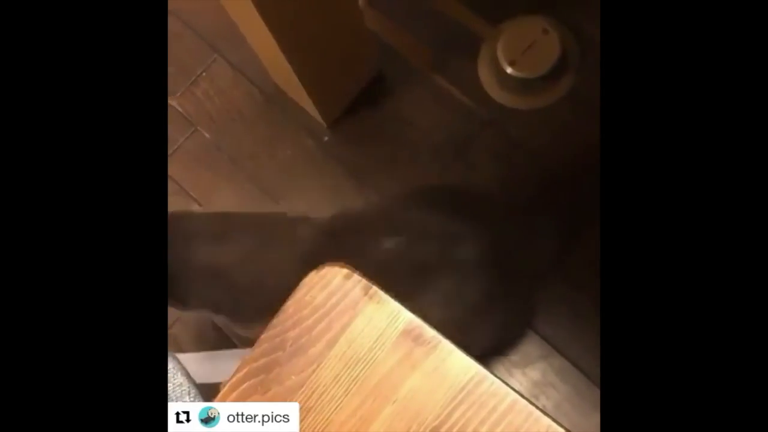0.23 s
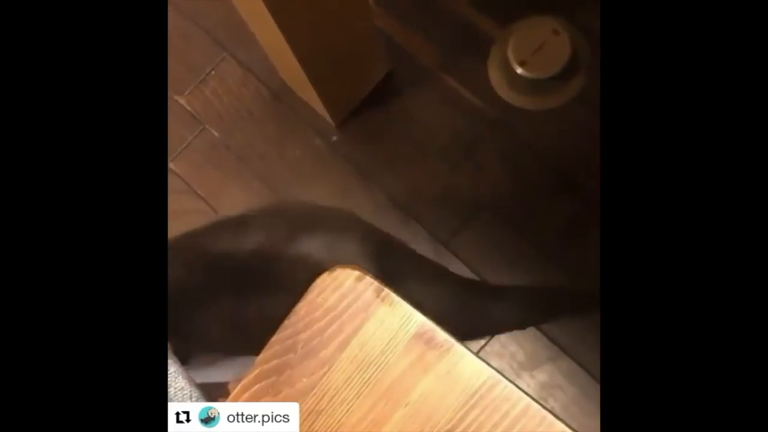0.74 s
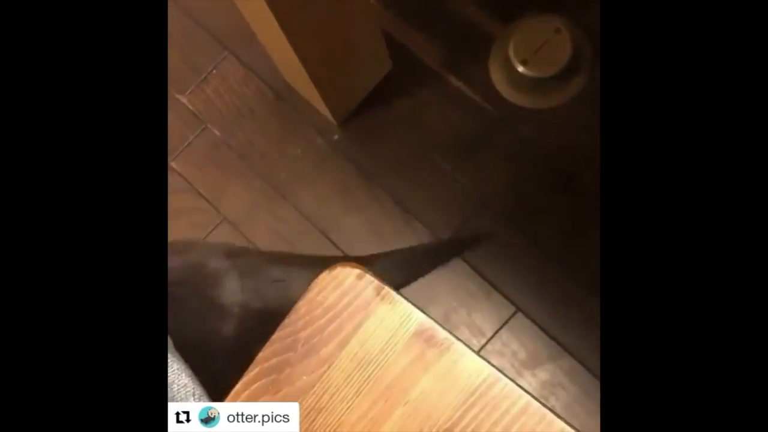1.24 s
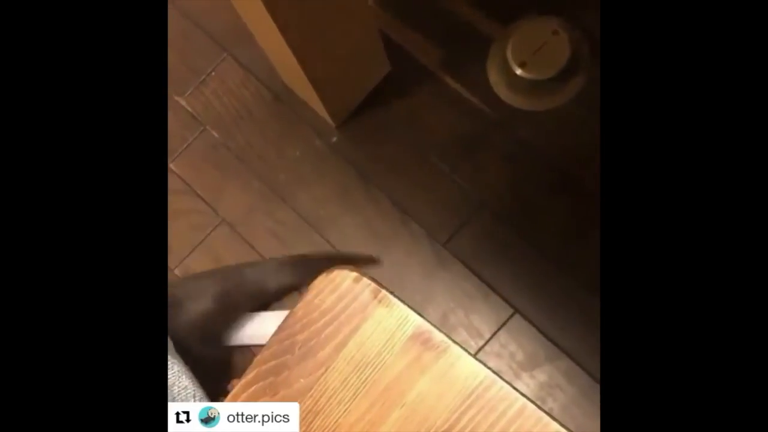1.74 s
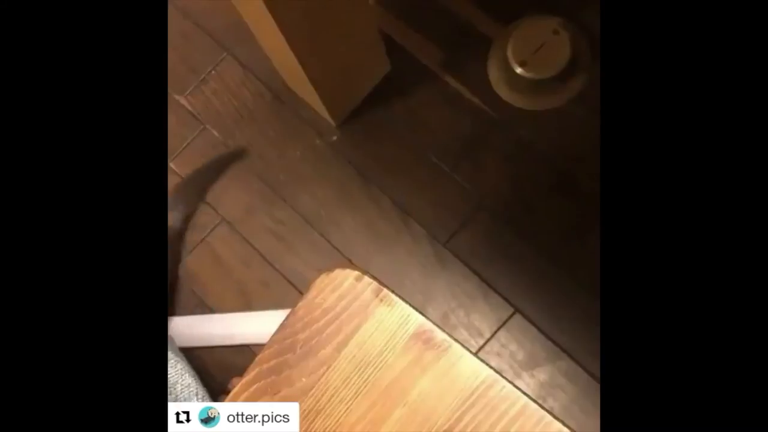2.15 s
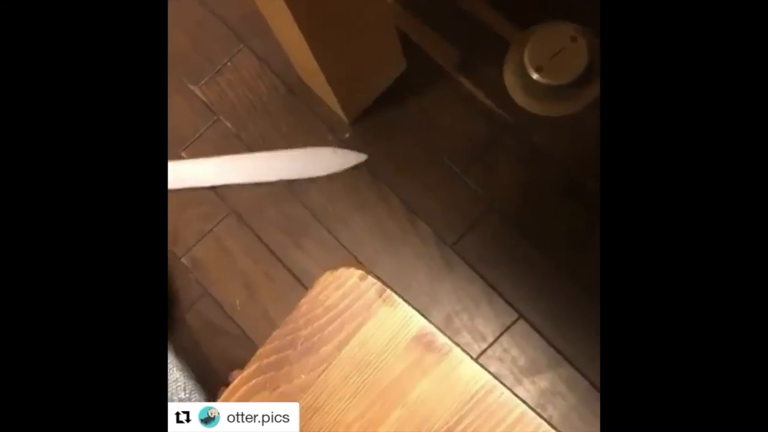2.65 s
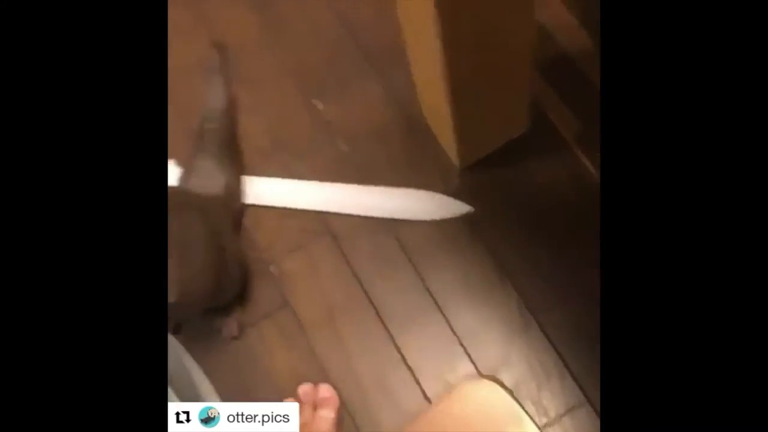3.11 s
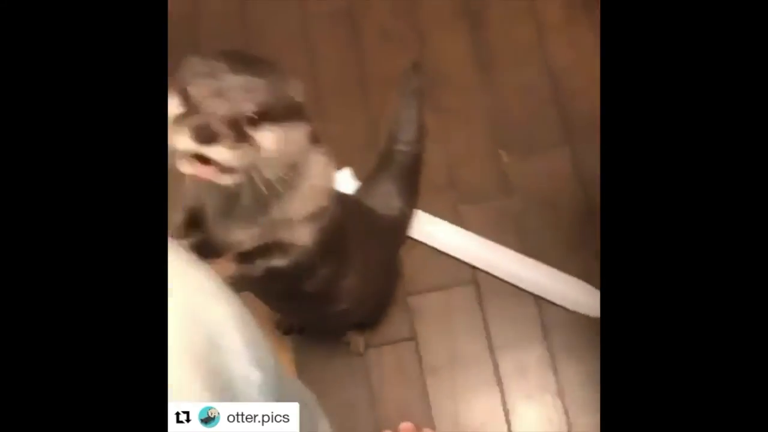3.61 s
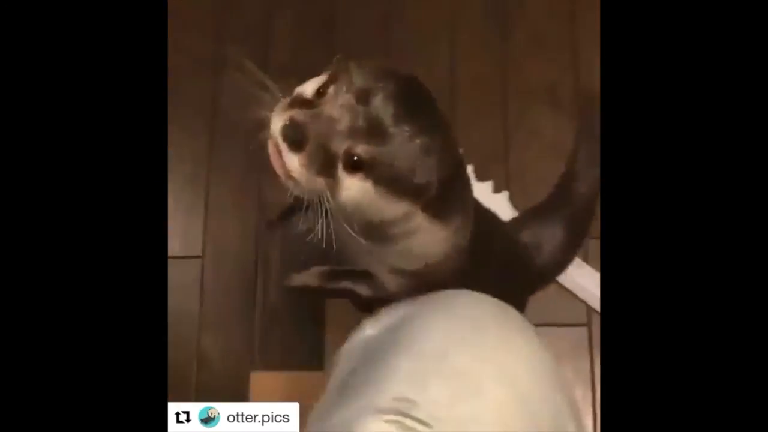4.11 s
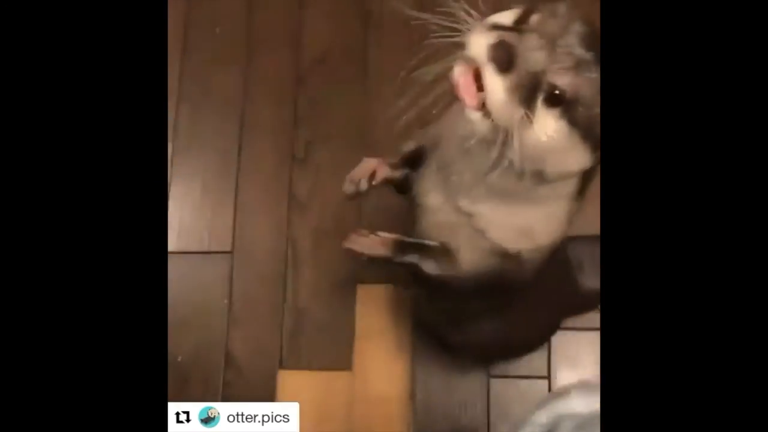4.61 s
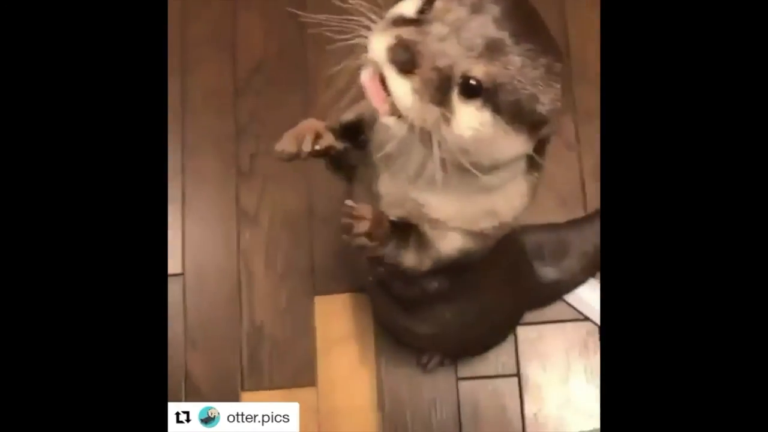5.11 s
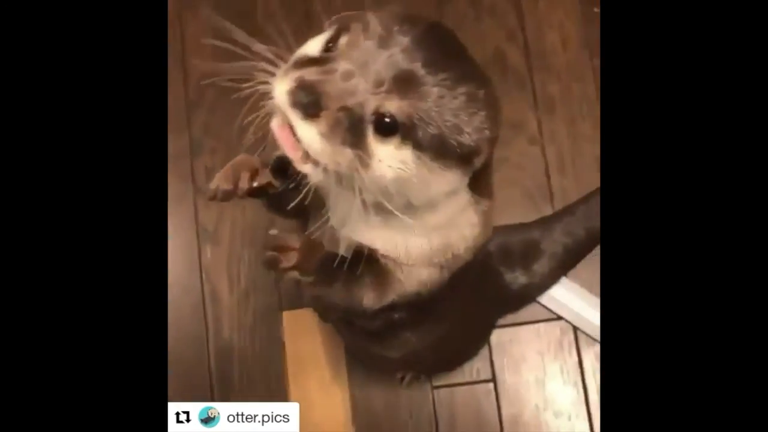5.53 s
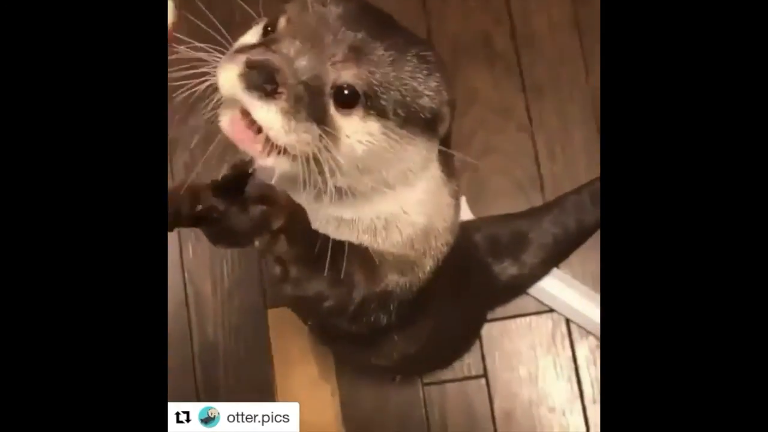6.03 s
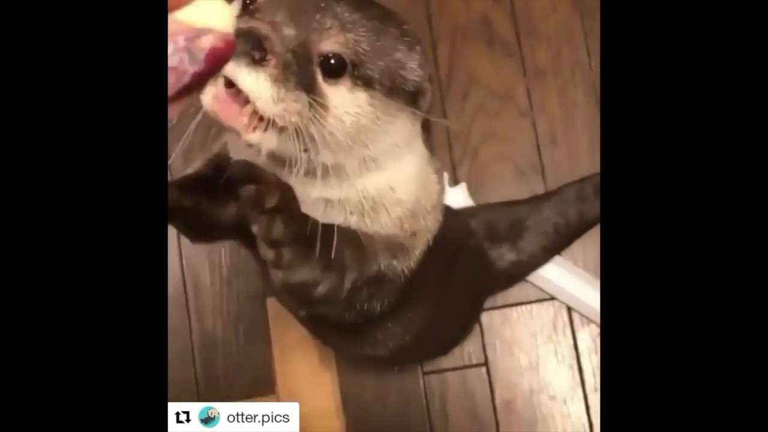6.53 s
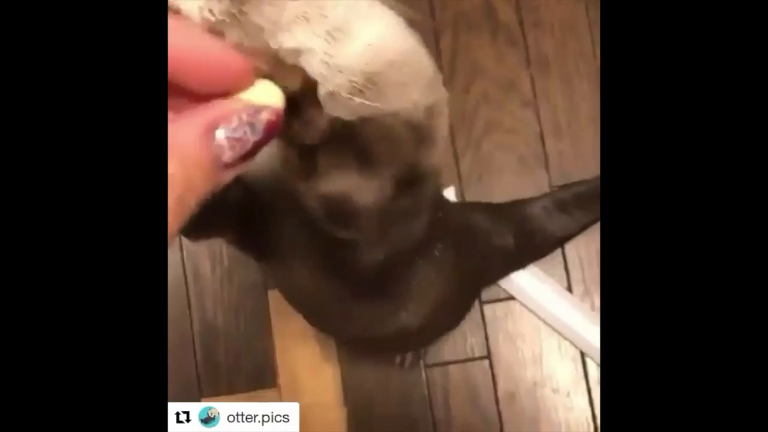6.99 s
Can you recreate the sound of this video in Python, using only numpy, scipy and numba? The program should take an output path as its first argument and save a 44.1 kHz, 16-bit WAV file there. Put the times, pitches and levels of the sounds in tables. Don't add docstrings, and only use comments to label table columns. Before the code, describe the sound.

Close, piercing otter begging cries with a hoarse edge, broken by a pause of soft scuffing and claw knocks on a wood floor.

```python
import sys
import numpy as np
from scipy import signal
from scipy.fft import rfft, irfft
from scipy.io import wavfile
from scipy.ndimage import uniform_filter1d, map_coordinates
from numba import njit

SR = 44100
rng = np.random.default_rng(int(sys.argv[2]) if len(sys.argv) > 2 else 0)


def to_wav(sig):
    pcm = np.clip(np.atleast_2d(sig), -1, 1) * 32767
    pcm = np.round(pcm).astype(np.int16)
    wavfile.write(sys.argv[1], SR, pcm.T)


def gain_from_db(level_db):
    decades = np.asarray(level_db, float) / 20
    return 10 ** decades


N = 320166

# start_s, pitch_hz, effort_db, strain (0-1), mouth_resonance_hz
SQUEAL = [(0.0, 468, -33, 0.94, 3320), (.018, 466, -26.5, 0.63, 3520), (.036, 385, -35, 0.98, 3280),
          (.05, 396.4, -39.5, 1.13, 2430), (.072, 389.5, -35.5, 1.22, 2400), (.1, 388.7, -34, 1, 2270),
          (.13, 437, -36, 0.82, 2190), (.154, 607, -56, 1, 2260)]
WHIMPER = [(.154, 601.5, -43.5, 0.85, 2200), (0.215, 622.6, -46, 0.63, 2470), (0.306, 626, -49, 0.67, 2620),
           (0.328, 651, -36, 0.2, 2505), (.421, 623, -47, 0.6, 2600), (0.504, 640.5, -51, 0.55, 2470),
           (.536, 478, -65, 1, 2574), (0.571, 353, -69, 0.98, 2640), (.64, 338, -57, 0.97, 2596)]
FALLING = [(2.21, 772, -73, 0.17, 2417), (2.248, 817, -36.5, 0.45, 2416), (2.281, 778, -46, 0.97, 2826),
           (2.338, 734, -45, 1, 2920), (2.391, 679, -37, 0.87, 3035), (2.506, 654.7, -33.5, 0.85, 3050),
           (2.62, 618, -28, 0.76, 3034), (2.692, 572.4, -32, 0.98, 3158), (2.787, 488.4, -29.5, 0.82, 3180)]
HICCUP = [(2.788, 490, -31, 0.76, 3040), (2.863, 657, -36.5, 0.66, 3174), (2.905, 678, -31.5, 0.49, 3100),
          (2.979, 559, -42.5, .1, 3160), (3.12, 515, -57, 0.34, 2652)]
WHINE = [(3.119, 520, -49, 0.55, 2680), (3.2, 553, -34, 0.14, 2760), (3.292, 589, -30.5, 0.51, 2890),
         (3.33, 565.5, -29.5, 0.45, 2880), (3.461, 587.4, -29, 0.44, 2727),
         (3.556, 609.6, -29.5, 0.45, 2750), (3.662, 587, -33.5, 0.42, 2870), (3.721, 593, -18, 0.83, 2767)]
SCREAM = [(3.848, 478, -31.5, 0.57, 2900), (3.875, 487, -25, 0.79, 3021), (3.914, 477, -27, 1.06, 3180),
          (3.94, 448.8, -24, 1, 3130), (4.084, 444, -25.5, 1.07, 3090), (4.104, 474.3, -24, 0.99, 3120),
          (4.182, 459.5, -24, 1.04, 3211), (4.227, 472.7, -24.5, 1.03, 3144),
          (4.239, 642.3, -28, 0.58, 3070)]
EASING = [(4.239, 627, -24, 0.67, 3130), (4.252, 635, -29.5, 0.75, 3176), (4.267, 542, -22, 0.73, 3100),
          (4.285, 618.4, -28, 0.53, 3170), (4.349, 640.6, -27, 0.64, 3060),
          (4.529, 589.2, -33.5, 0.42, 3070), (4.664, 595, -31, 0.54, 3040), (4.701, 567.4, -30, 0.48, 2942),
          (4.93, 546.8, -34.5, 0.35, 2860)]
PLEA = [(5.11, 557, -40.5, 0.75, 2960), (5.142, 560.6, -35, 0.59, 2400), (5.263, 581.8, -29.5, 0.65, 3006),
        (5.295, 558, -24.5, 0.65, 3046), (5.458, 576, -27.5, 0.35, 3023), (5.767, 604, -26.5, 0.16, 2890),
        (5.896, 579, -32.5, 0.47, 2677), (5.969, 556, -43, 0.26, 2870)]
DEMAND = [(6.242, 583, -35, 0.62, 2690), (6.282, 596.6, -24.5, 0.73, 3215), (6.411, 642, -22.5, 0.4, 2745),
          (6.525, 612, -25.5, 0.42, 2927), (6.77, 618.5, -25.5, 0.038, 3110), (6.822, 604, -34, 0.39, 2949),
          (6.981, 641.3, -27, 0.28, 2983), (7.1, 631.8, -27.5, 0.41, 2788), (7.26, 667.2, -21, 0.24, 2850)]
CRIES = [SQUEAL, WHIMPER, FALLING, HICCUP, WHINE, SCREAM, EASING, PLEA, DEMAND]


def rms_one(x):
    return x / np.sqrt(np.mean(x ** 2) + 1e-20)


def in_time(rows):
    s, *columns = np.transpose(rows)
    return [np.interp(np.arange(N) / SR, s, column) for column in columns]


def joined(tables, fade_s):
    t = np.arange(N) / SR
    inside = sum((t >= rows[0][0]) & (t < rows[-1][0]) for rows in tables) > 0
    gate = uniform_filter1d(inside * 1., int(fade_s * SR) + 1, mode="nearest")
    return in_time([row for rows in tables for row in rows]), gate


def per_cry(rows):
    shift_s = .02
    ends = [cry[-1][0] + .04 * (k in (1, 4, 6, 7)) for k, cry in enumerate(CRIES)]
    which = np.minimum(np.searchsorted(ends, np.arange(N) / SR), len(CRIES) - 1)
    return uniform_filter1d(np.array(rows, float)[which].T, int(shift_s * SR) + 1, mode="nearest")


def drift(rate_hz):
    r = np.exp(-2 * np.pi * rate_hz / SR)
    wander = signal.lfilter([1], [1, -2 * r, r * r], rng.standard_normal(N + SR))
    return rms_one(wander[SR:])


def wavering(rows, memory):
    fresh = rng.standard_normal((rows, 2))
    return signal.lfilter([np.sqrt(1 - memory ** 2)], [1, -memory], fresh, axis=0)


def evened(x, span_s):
    return x / np.sqrt(uniform_filter1d(x ** 2, int(span_s * SR)) + 1e-12)


@njit
def resonate(x, turn, r):
    y = np.zeros(len(x))
    for i in range(2, len(x)):
        y[i] = (1 - r * r) / 2 * (x[i] - x[i - 2]) + 2 * r * np.cos(turn[i]) * y[i - 1] - r * r * y[i - 2]
    return y


def resonance(x, hz, width_hz):
    return resonate(x, 2 * np.pi * hz / SR * np.ones(N), np.exp(-np.pi * width_hz / SR))


def coloured(spectrum):
    hz, level_db = np.transpose(spectrum)
    grid = np.arange(N // 2 + 1) * SR / N + 1
    gain = gain_from_db(np.interp(np.log(grid), np.log(hz), level_db))
    return rms_one(irfft(rfft(rng.standard_normal(N)) * gain, N))


def band_noise(order, low_hz, high_hz):
    band = signal.butter(order, [low_hz, high_hz], "band", fs=SR, output="sos")
    return signal.sosfilt(band, rng.standard_normal(N))


def patchy(x, patch_db):
    _, _, z = signal.stft(x, SR, nperseg=1024)
    field = uniform_filter1d(rng.standard_normal(z.shape), size=9, axis=0)
    field = rms_one(uniform_filter1d(field, size=6, axis=1))
    return signal.istft(z * gain_from_db(patch_db * field), SR, nperseg=1024)[1][:N]


def otter():
    # (db, db)
    posture = [(-57, -49, 5000, 4, -19), (-48, -41, 4100, -15, 11.5), (-44, -47.5, 4770, -28, -6),
               (-46.5, -46, 4400, -20, -8.5), (-55.5, -40, 4330, 4, 8), (-53, -42.5, 4760, 8, -1),
               (-48.5, -36.5, 4600, 1.5, 8), (-48, -38, 4510, -0.5, 10.5), (-41.5, -38.5, 4590, -2, 10)]
    breath = [(.05, .004), (.12, .006), (.1, .004), (.16, .01), (.14, .006), (.11, .005), (.2, .005),
              (.15, .005), (.15, .004)]
    # start_s, pitch_drop (share)
    stops = [
        (0.608, 0.018),
        (3.668, 0.17),
        (4.873, 0.26),
        (5.925, 0.28),
    ]
    # start_s, end_s, pitch_drop (share)
    creak = (5.055, 5.076, .62)
    stop_s, stop_db = .018, 36
    creak_weak_s, creak_weak_db = .0155, -14
    t = np.arange(N) / SR
    (pitch, effort_db, strain, mouth_hz), gate = joined(voiced(), fade_s=.002)
    first_db, second_db, upper_hz, *facing_db = per_cry(posture)
    leak, quiver = per_cry(breath)
    folds = fold_state()

    slack = sum(share * np.clip((t - s) / .035, 0, 1) * (t < s + .1) for s, share in stops)
    stopping = sum(np.clip((t - s) / stop_s, 0, 1) * (t < s + .1) for s, _ in stops)
    gate = gate * gain_from_db(-stop_db * stopping)
    creaking = (t > creak[0]) & (t < creak[1])
    slack = slack + creak[2] * creaking
    pitch = pitch * (1 - slack - slips())
    cycles = np.cumsum(pitch * (1 + quiver * drift(45))) / SR + .5
    chance = wavering(8000, .65)

    chest = low_partials(cycles, pitch, effort_db, first_db, second_db, folds)
    chest = chest * np.where(creaking, gain_from_db(-10.5), 1)
    rasp_db = effort_db - 30 * (1 - strain) + 80 * slips()
    mouth = mouth_ring(cycles, chance, folds, leak, mouth_hz, upper_hz)
    rasp = throat_rasp(cycles, chance, folds, leak, facing_db)
    shrill = gain_from_db(effort_db) * evened(mouth, .013) + gain_from_db(rasp_db) * evened(rasp, .2)
    shrill = shrill * np.where((t > creak[0]) & (t < creak[0] + creak_weak_s), gain_from_db(creak_weak_db), 1)
    flutter = gain_from_db(.32 * drift(33))
    return gate * (np.sqrt(2) * chest + flutter * shrill)


def voiced():
    # lag_s, pitch (share), effort_db, strain (0-1)
    yelp_shape = [
        (0, .84, 1.5, 0.62),
        (.015, .9, -1.5, 0.66),
        (.04, .995, -8, .55),
    ]
    # start_s, pitch_hz, peak_effort_db, mouth_resonance_hz
    yelp_starts = [
        (5.062, 563.6, -25, 2866),
        (6.1898, 580, -25.5, 2740),
    ]
    yelps = []
    for (s, hz, db, mouth_hz), cry in zip(yelp_starts, (PLEA, DEMAND)):
        opening = [(s + lag, share * hz, db + rel_db, strain, mouth_hz) for lag, share, rel_db, strain in yelp_shape]
        yelps.append(opening + [cry[0]])
    return CRIES[:-2] + [yelps[0], PLEA, yelps[1], DEMAND]


def fold_state():
    # unevenness_db, timing_scatter (cycles)
    steadiness = [(1.2, .008), (1.5, .013), (1.8, .01), (2.4, .026), (1.8, .017), (1.0, .017), (1.7, .021),
                  (1.6, .015), (1.6, .014)]
    # centre_s, half_length_s, added_scatter (cycles), strong_weak_alternation (0-1)
    falter = [(.34, .05, 0, .8), (.44, .09, .014, .35), (2.84, .12, .02, .1), (3.68, .15, .004, .15),
              (3.87, .04, .02, .2), (4.06, .07, .012, .05), (4.2, .04, .012, .05), (4.76, .05, .015, .1),
              (5.3, .2, .008, .15), (6.35, .2, .012, .1), (6.6, .08, .008, .1), (7.06, .05, .01, .1)]
    uneven_db, scatter = per_cry(steadiness)
    t = np.arange(N) / SR
    added, alternate = .3 * slips(), 0
    for s, half_s, spell_scatter, spell_alternation in falter:
        spell = np.clip(1.5 - 1.5 * np.abs(t - s) / half_s, 0, 1)
        added = added + spell * spell_scatter
        alternate = alternate + spell * spell_alternation
    return uneven_db + 40 * added, scatter + added, alternate


def slips():
    # start_s, pitch_drop (share)
    slip_events = [(2.311, 0.019), (2.445, 0.017), (2.664, 0.028), (3.314, 0.056), (3.371, .02),
                   (3.41, 0.05), (3.447, 0.047), (3.491, 0.03), (3.513, 0.053), (3.555, 0.057),
                   (3.6, 0.053), (3.985, 0.034), (4.14, 0.035), (4.18, 0.026), (4.295, 0.04), (4.319, .02),
                   (4.42, 0.022), (4.53, .02), (4.625, 0.029), (4.675, 0.031), (4.735, 0.023), (4.8, 0.016),
                   (5.109, 0.019), (5.22, 0.019), (5.281, 0.041), (5.325, 0.024), (5.375, 0.027),
                   (5.49, 0.06), (5.537, 0.036), (5.563, 0.045), (5.66, .012), (5.785, 0.02017),
                   (6.265, 0.032), (6.325, 0.029), (6.36, 0.027), (6.464, 0.033), (6.51, 0.019),
                   (6.572, .03), (6.646, 0.024), (6.68, 0.016), (6.791, 0.023), (6.925, 0.026),
                   (6.996, 0.034), (7.04, 0.029), (7.085, 0.027), (7.129, .02), (7.215, 0.022)]
    slip_s, regain_s = .006, .018
    t = np.arange(0, N, 16) / SR
    lost = sum(share * np.clip((t - s) / slip_s + .5, 0, 1) * np.exp(-np.maximum(t - s, 0) / regain_s)
               for s, share in slip_events)
    return np.interp(np.arange(N) / SR, t, lost)


def pulses(cycles, chance, spread, folds):
    uneven_db, scatter, alternate = folds
    k = np.arange(1, int(cycles[-1]))
    at = np.interp(k, cycles, np.arange(N)).astype(int)
    place = np.interp(k + spread * scatter[at] * chance[k, 0], cycles, np.arange(N))
    size = gain_from_db(spread * uneven_db[at] * chance[k, 1]) * (1 + alternate[at] * (-1.) ** k)
    taps = place.astype(int)[:, None] + np.arange(-7, 9)
    off = taps - place[:, None]
    click = size[:, None] * np.sinc(off) * np.cos(off * np.pi / 16) ** 2
    out = np.zeros(N)
    np.add.at(out, np.clip(taps, 0, N - 1), click)
    return out


def breathy_pulses(cycles, chance, folds, air):
    puff = np.exp(-2.5 * (cycles % 1))
    return pulses(cycles, chance, 1, folds) + air * puff * rng.standard_normal(N)


def low_partials(cycles, pitch, effort_db, first_db, second_db, folds):
    # start_s, first_partial_db, second_partial_db
    throat = [
        [(0, 10, 4.5), (.1, 7.5, 6.5), (.13, 18, 9), (.17, 3, 3), (.22, 3, 5), (.3, -3, 1), (.335, 2.5, -16),
         (.37, -6, -6), (.5, -11, -1)],
        [(.525, -9, -10), (.55, 3, -3), (.6, -6.5, -24)],
        [(2.21, 0.5, -34), (2.3, 0.5, -4), (2.45, -8, -2), (2.6, -7, 1.5), (2.78, 0.5, 2), (2.9, 5, -2),
         (3.05, -7.5, 3), (3.15, -2.5, -9)],
        [(3.25, 0, -6.5), (3.4, 7.5, -4.5), (3.6, 10.5, 1), (3.85, -1, -0.5), (3.95, -2, -3), (4.1, 2, -4),
         (4.22, 3, -3)],
        [(4.3, 2, -9.5), (4.45, 3, -3), (4.65, 2, -4.5), (4.85, 2, -1.5), (5.1, 1.5, -4), (5.3, 2, -3.5),
         (5.58, 2.5, -4), (5.77, 2, -1), (5.9, 2.5, 0)],
        [(6.2, -4, -2.5), (6.37, 2, -3), (6.55, 1.5, -3), (6.75, 0, -1), (6.85, -0.5, -1.5), (7.03, 2, -2.5),
         (7.09, 1, 0), (7.2, 3, 1)],
    ]
    first_lift_db, second_lift_db = in_time([row for passage in throat for row in passage])
    swing_db = effort_db + 30
    first_db = first_db + .042 * swing_db + first_lift_db
    second_db = second_db + .34 * swing_db + second_lift_db
    _, hoarse, alternate = folds
    shake = 6.5 * hoarse * drift(370)
    turn = 2 * np.pi * cycles + shake
    chest = gain_from_db(first_db + drift(50)) * np.sin(turn)
    chest += gain_from_db(second_db + drift(50)) * np.sin(2 * turn)
    half_lines = np.sin(3 * np.pi * cycles) + np.sin(5 * np.pi * cycles)
    chest += alternate ** 2 * gain_from_db(first_db - 5) * half_lines
    below_mouth = np.clip((1750 - 3 * pitch) / 250, 0, 1)
    return chest + below_mouth * gain_from_db(second_db - 2.5) * np.sin(3 * turn)


def mouth_ring(cycles, chance, folds, leak, mouth_hz, upper_hz):
    # ratio (to the main one), width_hz, level_db
    cavities = [(0.604, 480, -4.5), (0.767, 330, 4.5), (1.001, 285, 13), (1.222, 478, 2.5)]
    # lowest_db, below_db, above_db
    tongue = [(4, -5, 4), (-9, 7.5, 6), (7, -0.5, 1), (1, 0.5, 1), (-0.5, 1.5, -3), (-0.5, -1, 3),
              (5.5, -8, -2.5), (-10, -0.5, 2.5), (2, -1, 0)]
    lowest_db, below_db, above_db = per_cry(tongue)
    lift_db = (lowest_db, below_db, 0, above_db, 0)
    tract = [(ratio * mouth_hz, width_hz, db) for ratio, width_hz, db in cavities] + [(upper_hz, 650, 7)]
    hoarse, mouth = folds[1], 0
    for k, (hz, width_hz, db) in enumerate(tract):
        own = chance * [1, .8] + wavering(8000, .6) * [.2 + .07 * k, 1]
        air = (.3 + .4 * k) * hoarse + (0, 0, 0, .12, .18)[k] * leak
        drive = breathy_pulses(cycles, own, folds, air)
        db = db + lift_db[k] + 1.3 * (.5 + abs(k - 2)) * drift(14)
        tone = resonance(resonance(drive, hz, width_hz), hz, 4 * width_hz)
        mouth = mouth + (-1) ** k * gain_from_db(db) * rms_one(tone)
    return mouth


def throat_rasp(cycles, chance, folds, leak, facing_db):
    # centre_hz, width_hz, level_db
    rasp_bands = [(5210, 2970, 5.5), (6720, 1800, -2.5), (8100, 1740, -2.5), (10220, 4900, -3.5)]
    teeth = [(8750,), (8610,), (8450,), (8700,), (8560,), (8490,), (8900,), (8000,), (8485,)]
    snap_lift = [(9.9,), (0.1,), (0.1,), (0.082,), (0.1,), (1.5,), (0.12,), (0.1,), (0.1,)]
    teeth_hz, = per_cry(teeth)
    snap_lift_db, = per_cry(snap_lift)
    facing = [1, 1, *gain_from_db(facing_db)]
    hoarse, rasp = folds[1], 0
    for k, (hz, width_hz, db) in enumerate(rasp_bands):
        hz = teeth_hz if k == 2 else hz
        own = chance * [1, .8] + wavering(8000, .3) * [.1, .7]
        drive = breathy_pulses(cycles, own, folds, 1.1 * leak + 3 * hoarse)
        hiss = resonance(resonance(drive, hz, width_hz), hz, 2 * width_hz)
        rasp = rasp + facing[k] * gain_from_db(db + 2.2 * drift(9)) * rms_one(hiss)
    snap = rms_one(resonance(pulses(cycles, chance, .77, folds), 5540, 2150))
    return rasp / np.std(rasp) + np.minimum(facing[2], 1) * gain_from_db(snap_lift_db - 7) * snap


def hollowed(x):
    # lower_hz, lower_depth (0-1), upper_hz, upper_depth (0-1)
    hollows = [(12000, 1, 12700, .9), (10100, 0.4, 12000, .3), (9000, 1, 12800, 0.8), (9200, .7, 12900, .6),
               (7510, 0.06, 10950, 0.25), (9900, 0.5, 17000, 0.8), (9760, 0.03, 12900, 0.35),
               (7757, 0.1, 11440, 0.27), (8204, 0.14, 11400, 0.37)]
    width_hz = 1050
    low_hz, low, high_hz, high = per_cry(hollows)
    x = x - np.clip(low, 0, 1) * resonance(x, low_hz, width_hz)
    return x - np.clip(high, 0, 1) * resonance(x, high_hz, width_hz)


def off_the_floor(x):
    shrill = signal.sosfilt(signal.butter(2, 1600, "high", fs=SR, output="sos"), x)
    echo_s, sway_s = .0016, .00022
    lag = (echo_s + sway_s * drift(3)) * SR
    return x + gain_from_db(-9) * map_coordinates(shrill, [np.arange(N) - lag], order=3, mode="nearest")


def contact(fall_db_per_s, column):
    # strongest_s, rub_db, build_up_s, board_weight_db, fur_swish_db
    drags = [(1.107, -44.5, 0.017, -4.5, -13.5), (1.19, -58, 0.38, -2.5, -32),
             (1.453, -53, 0.078, -2.5, -7.5), (1.558, -56, 0.01, 4.5, -24),
             (1.666, -40.5, 0.049, -11, -12.5), (1.8, -59, 0.29, -2, -14), (1.861, -39, 0.0036, 3, -21),
             (2.045, -55, 0.0074, 4.5, -29), (2.604, -45.5, 0.059, -4.5, -7), (2.7, -44, 0.1, -9, -8),
             (2.8, -44.5, 0.18, -10, -3), (2.882, -48, 0.082, -9, 0), (2.98, -57, 0.12, -27, 0),
             (6.0, -71, 0.024, -6, 20), (6.04, -90, 0.019, -20, 34)]
    build_up_db = 20.5
    t = np.arange(0, N, 16) / SR
    power = 0
    for row in drags:
        s, rub_db, build_up_s = row[:3]
        peak_db = rub_db + (row[column] if column else 0)
        below_db = np.maximum(build_up_db * (s - t) / build_up_s, fall_db_per_s * (t - s))
        power = power + gain_from_db(2 * (peak_db - below_db))
    return np.interp(np.arange(N) / SR, t, np.sqrt(power))


def scuffs():
    # freq_hz, level_db (per Hz)
    rub_colour = [(290, -49), (500, -14), (782, 11.5), (877, 3), (1190, 5), (3490, -9.5), (3640, -9.5),
                  (6000, -21.5), (7800, -69), (13200, -120)]
    pad_lift_off, fur_lift_off = 206, 272
    rumble = rms_one(band_noise(2, 110, 450))
    swish = rms_one(band_noise(1, 3500, 11000))
    rub = coloured(rub_colour) * gain_from_db(2.9 * drift(92))
    out = contact(pad_lift_off, column=3) * rumble
    out += contact(pad_lift_off, column=0) * rub
    return out + contact(fur_lift_off, column=4) * swish


def ring(clicks, hz, t60_s):
    r, w = gain_from_db(-60 / (t60_s * SR)), 2 * np.pi * hz / SR
    return signal.lfilter([0, np.sin(w)], [1, -2 * r * np.cos(w), r * r], clicks + 1e-18)


def knocks():
    # start_s, peak_db, pitch_hz
    strikes = [
        (1.11, -29.5, 830),
        (1.164, -61, 712),
        (1.555, -60, 320.7),
        (1.861, -22, 749),
        (2.04, -27, 416),
        (3.871, -27.5, 720.7),
        (4.09, -32, 936.8),
        (5.071, -24.5, 1064),
        (6.091, -29, 1187),
        (6.14, -33.5, 2980),
    ]
    # pitch_hz, level_db, t60_s
    board = [(130, -4, .15), (200, -4, .12), (290, -3, .2), (335, -4, .12), (544, -3, .06), (740, -2, .05),
             (820, -2, .045), (1130, -3, .04), (1300, -3, .035), (1850, -5, .03), (2840, -5, .03),
             (3700, -5, .025)]
    s, peak_db, knock_hz = np.transpose(strikes)
    chance, out = rng.normal(0, 3, (len(s), len(board))), 0
    for k, (hz, db, t60_s) in enumerate(board):
        distance_db = 19.6 * np.abs(np.log2(hz / knock_hz))
        clicks = np.zeros(N)
        clicks[(s * SR).astype(int)] = gain_from_db(peak_db + db - 8 - distance_db + chance[:, k])
        out = out + ring(clicks, hz, t60_s)
    return signal.sosfilt(signal.butter(2, 100, "high", fs=SR, output="sos"), out)


def bumps():
    # start_s, peak_db, pitch_hz
    phone_bumps = [
        (4, -54, 108.6),
        (5.591, -45, 65.45),
        (6.037, -53.5, 80),
        (6.108, -49, 59.3),
        (6.54, -46.5, 69.7),
        (6.981, -54, 72),
    ]
    # start_s, peak_db, pitch_hz
    onset_swell = [
        (5.068, -47.5, 209.3),
    ]
    t = np.arange(N) / SR
    out = 0
    for s, db, hz in [*phone_bumps, *onset_swell]:
        swell = np.exp(-((t - s - .025) / .019) ** 2)
        out = out + gain_from_db(db) * swell * np.sin(2 * np.pi * hz * (t - s))
    return out


def room(x):
    t = np.arange(SR // 2) / SR
    tail = rng.standard_normal(len(t)) * (t > .004)
    tail = signal.sosfilt(signal.butter(1, 620, "high", fs=SR, output="sos"), tail)
    dull = signal.sosfilt(signal.butter(1, 3500, fs=SR, output="sos"), tail)
    t60_s = .44
    tail = dull * gain_from_db(-60 * t / t60_s) + (tail - dull) * gain_from_db(-110 * t / t60_s)
    echo = signal.fftconvolve(x, tail / np.sqrt(np.sum(tail ** 2)))[:N]
    smear_s = .00005 * drift(40)
    return map_coordinates(echo, [np.arange(N) + smear_s * SR], order=3, mode="nearest")


def room_air():
    # freq_hz, level_db (per Hz)
    air_colour = [(26, -96), (45, -10.5), (219, -10), (601, -20.5), (1690, -17.5), (2600, -25), (2930, -24),
                  (3640, -28), (14000, -36)]
    return gain_from_db(-62 + drift(41)) * patchy(coloured(air_colour), patch_db=2.6)


def scene():
    voice = patchy(hollowed(otter()), patch_db=1.2)
    near = off_the_floor(voice) + scuffs() + knocks()
    return (near + gain_from_db(-12) * room(near) + bumps() + room_air())[None]


def muted_dips(x):
    # freq_hz, dip_db
    allowed_dip = [(500, 40), (1500, 21), (3000, 18), (5500, 10), (7500, 4.2), (12000, 2.4), (13300, 1.1)]
    hz, _, z = signal.stft(x, SR, nperseg=2048, noverlap=1536)
    lasting = uniform_filter1d(np.abs(z) ** 2, size=7, axis=1) + 1e-30
    narrow = uniform_filter1d(lasting, size=11, axis=0)
    wide = uniform_filter1d(lasting, size=91, axis=0)
    masked = narrow < narrow.max(axis=0) * gain_from_db(-2 * 36)
    dip_db = np.interp(hz, *np.transpose(allowed_dip))[:, None] - 1.8 * masked
    whim = uniform_filter1d(rng.standard_normal(z.shape), size=15, axis=0)
    dip_db += 1.9 * rms_one(uniform_filter1d(whim, size=6, axis=1))
    kept = z * (narrow > wide * gain_from_db(-2 * dip_db))
    return signal.istft(kept, SR, nperseg=2048, noverlap=1536)[1][:N]


def band_limit(x):
    return signal.sosfilt(signal.butter(12, 14110, fs=SR, output="sos"), x)


def record(dry):
    overload = .6
    rounded = overload * np.tanh(dry[0] / overload)
    top_cut = signal.cheby2(14, 40, 14150, fs=SR, output="sos")
    mix = signal.sosfilt(top_cut, muted_dips(rounded)[None])
    return band_limit(mix)


dry = scene()
out = record(dry)
to_wav(out)
```